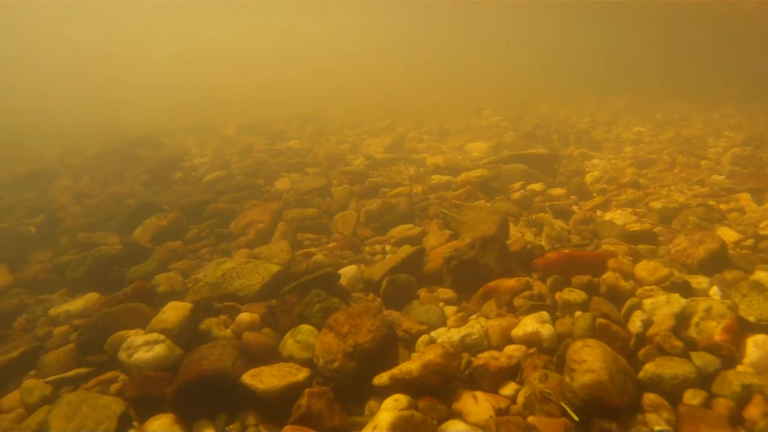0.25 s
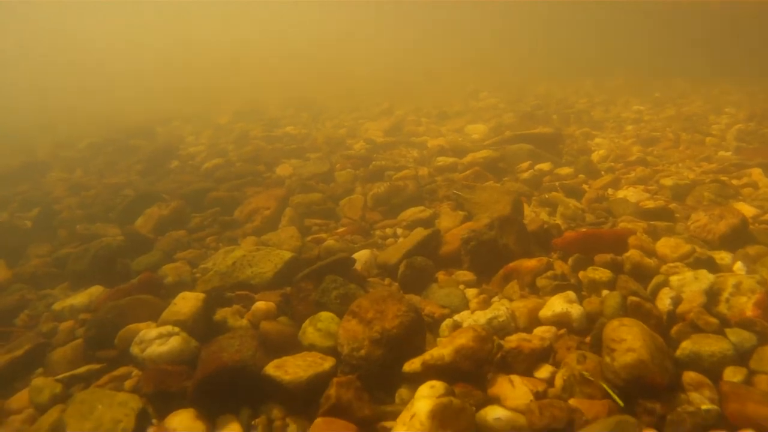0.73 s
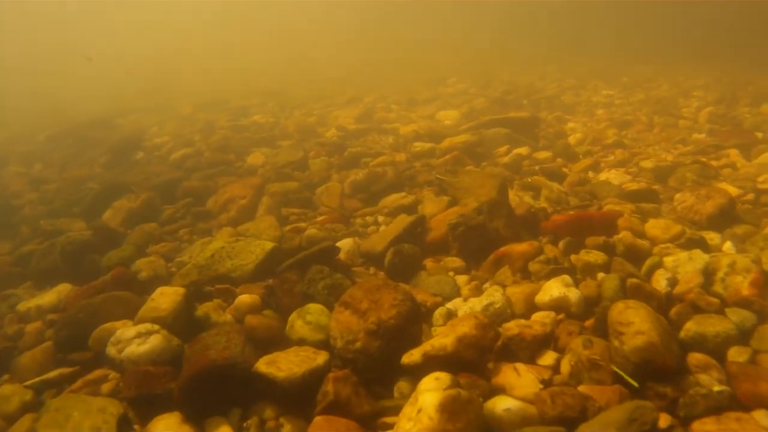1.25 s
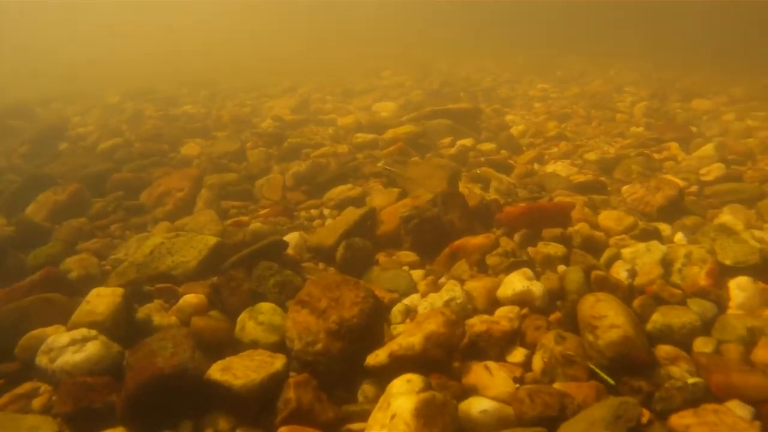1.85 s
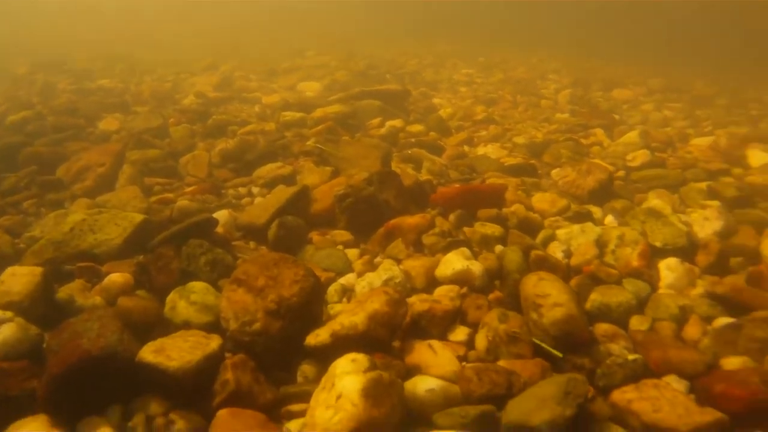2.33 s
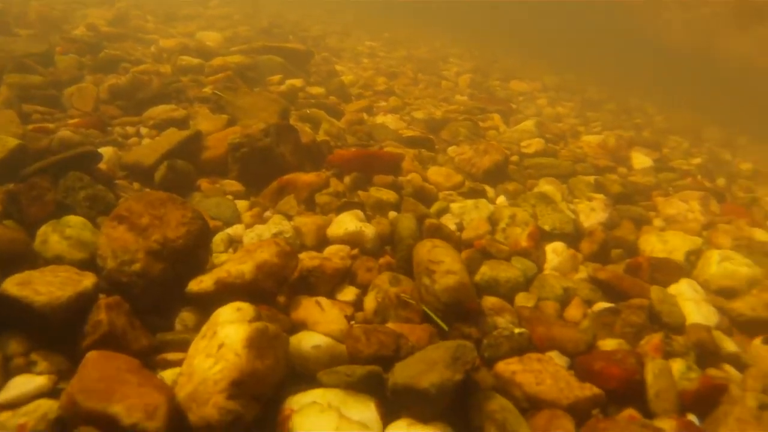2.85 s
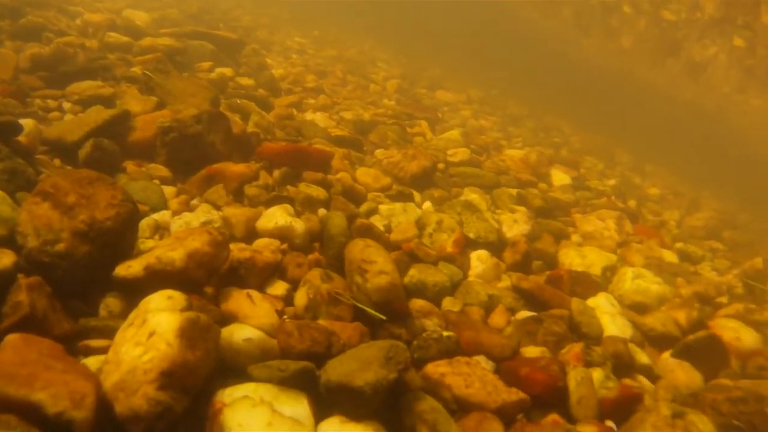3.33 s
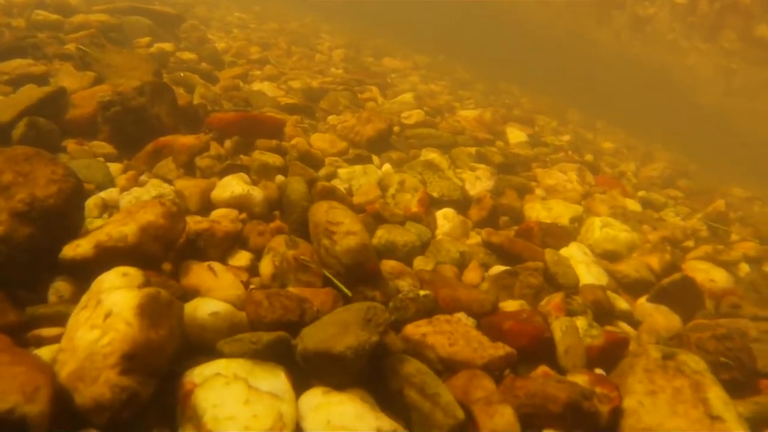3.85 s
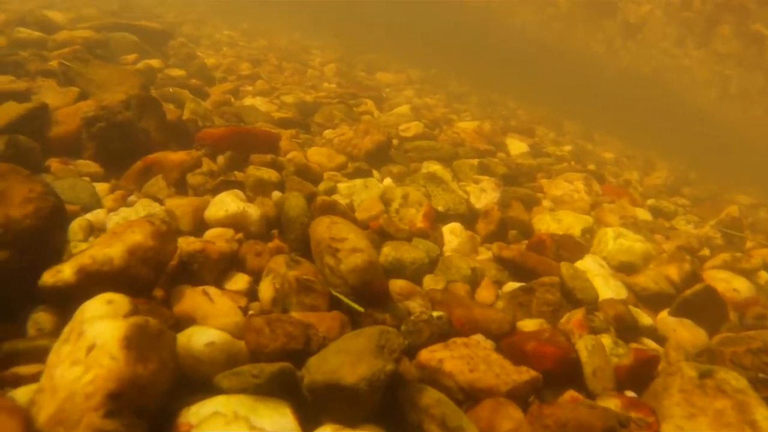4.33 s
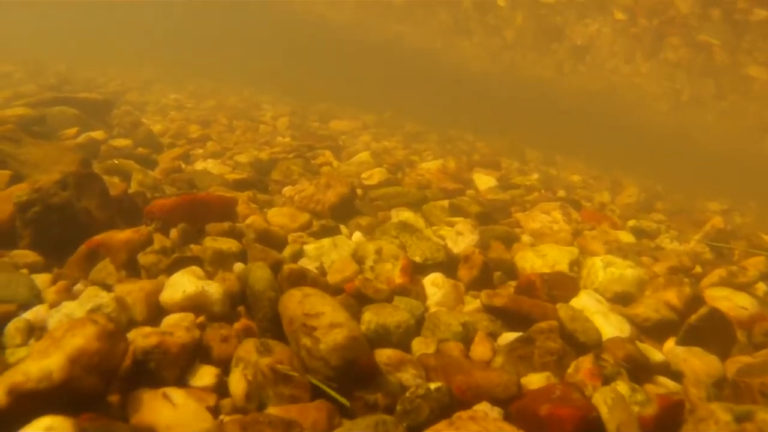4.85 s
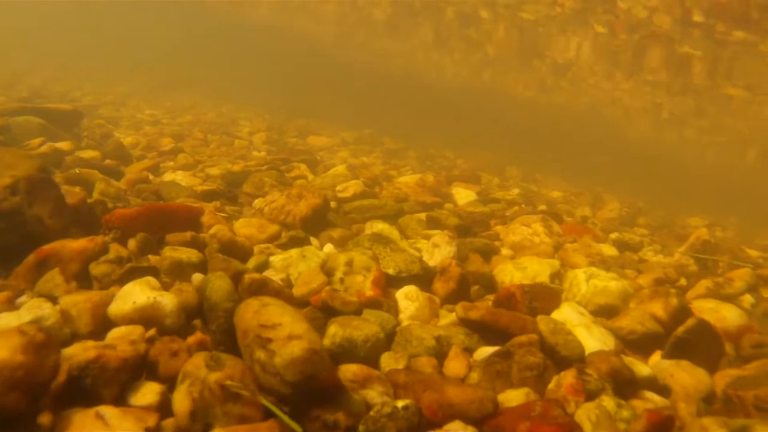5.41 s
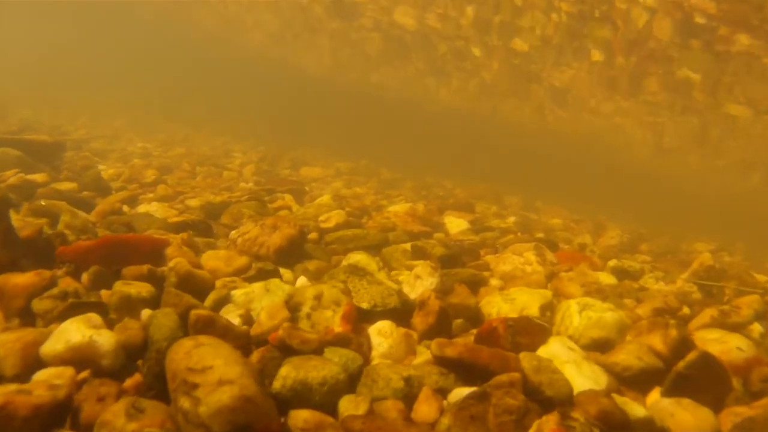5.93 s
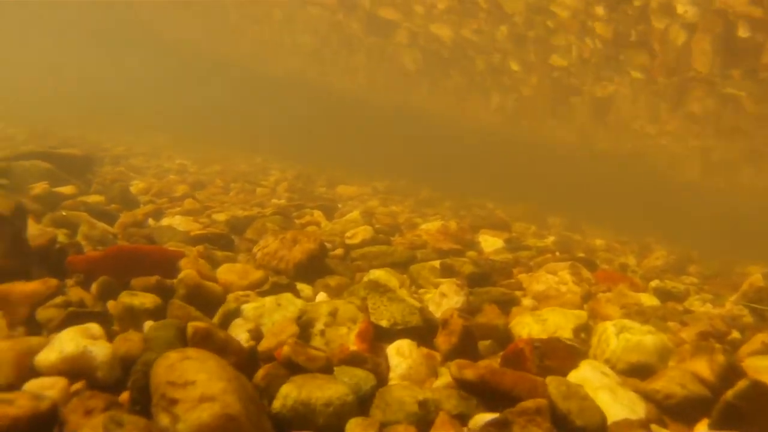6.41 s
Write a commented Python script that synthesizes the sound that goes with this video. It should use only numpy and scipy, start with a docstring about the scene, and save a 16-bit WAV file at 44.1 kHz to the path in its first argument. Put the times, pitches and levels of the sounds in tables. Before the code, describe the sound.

A shallow river is heard underwater through the wall of a plastic housing, close above a stony bed. From the start the current makes a soft, muffled rumble and gurgle over very faint hiss. At about 0.4 seconds a pebble knocks hard and the housing jolts with a dull thump, followed by a brief surge of water. Sparser, lighter knocks, ticks of the mount and tiny snaps of sand follow. Near 3 seconds the flow swells, another hard knock lands, and a few small bubble-like plinks begin. From about 4.3 seconds the impacts crowd together: short hollow knocks, sharp clicks and low thumps, thickest between 4.5 and 5.5 seconds, over a slightly stronger current. A faint sandy swish passes around 6.1 seconds, and more firm knocks continue until a last ringing one at about 6.6 seconds. Everything sounds close and centred.

```python
"""A camera in a plastic housing lies under a shallow river, just over the stony bed. From the start the
current rumbles and gurgles through the wall, over faint amplifier hiss. At 0.4 s a pebble knocks hard and
the housing jolts with a dull thump; sparser knocks, ticks of the mount and snaps of sand follow. Near 3 s
the flow swells and small plinks begin. From 4.3 s to the end the impacts crowd together, each exciting
damped modes. One microphone feeds both channels; only the hiss differs between them."""
import sys
import numpy as np
from scipy import signal
from scipy.fft import rfft, irfft, next_fast_len
from scipy.io import wavfile
from scipy.ndimage import uniform_filter1d, map_coordinates

SR = 44100
rng = np.random.default_rng(int(sys.argv[2]) if len(sys.argv) > 2 else 0)


def unload_audio(sound):
    """Save the sound as a 16-bit wav file, at the path given as the first command line argument."""
    columns = np.transpose(np.atleast_2d(sound))
    # keep every value between -1 and 1, then stretch to whole-number steps
    steps = np.round(np.clip(columns, -1, 1) * 32767)
    wavfile.write(sys.argv[1], SR, steps.astype(np.int16))


N = 294147

# ticks of the mount, before the wall muffles them: (time [s], mount level [dB], bright level [dB])
TICK_EVENTS = [(.388, -43.5, -55.5), (1.3068, -44.5, -69), (1.9268, -39.5, -66), (2.2, -59, -69),
               (2.3054, -39.5, -62), (2.4114, -56, -82), (2.535, -64, -73), (2.5547, -37, -67.5),
               (2.7477, -46, -59), (2.8265, -34.5, -64), (2.844, -58, -65), (2.879, -52, -70),
               (2.9213, -47.5, -75), (2.979, -49, -80), (3.079, -32, -63), (3.4026, -58, -66),
               (3.429, -46.5, -85), (3.5058, -33, -63), (3.8516, -38.5, -66), (3.873, -57, -72),
               (3.9037, -50, -67), (4.102, -54, -58.5), (4.3287, -35, -62.5), (4.4326, -50.5, -69),
               (4.5152, -53, -83), (4.6006, -42, -52.5), (4.625, -55, -63), (4.6661, -55, -68),
               (4.8924, -43.5, -52.5), (4.9211, -55, -50), (5.1616, -47.5, -68), (5.201, -49, -67),
               (5.275, -36.5, -37.5), (5.2945, -45, -48.5), (5.3221, -48, -72), (5.361, -47, -53.5),
               (5.446, -50.5, -67), (5.456, -44.5, -61), (5.465, -38.5, -36), (5.4776, -33.5, -47),
               (5.5478, -48.5, -58), (5.6945, -47.5, -62), (5.765, -50.5, -59.5), (5.8422, -49.5, -73),
               (6.0543, -49, -52), (6.1195, -50, -68), (6.142, -47.5, -52), (6.2273, -41, -51.5),
               (6.5679, -57, -70), (6.633, -49, -60.5)]
SHELL_HZ, SHELL_T60_S, MOUNT_HZ, MOUNT_T60_S = 336.3, 0.021, 1891, 0.024  # modes of the housing


def amp(db):
    """Amplitude grows tenfold for every 20 dB."""
    return 10 ** (np.asarray(db) / 20)


def unit(x):
    """Normalisation to rms 1."""
    return x / np.sqrt(np.mean(x ** 2) + 1e-20)


def wash(depth_db, rate):
    """Amplitude modulation: white noise whose level wanders through rate random values a second."""
    noise, knots = rng.standard_normal(N), rng.standard_normal(int(N * rate / SR) + 4)
    return noise * amp(depth_db * map_coordinates(knots, [np.arange(N) * rate / SR]))


def grit(rate, spread_db):
    """Shot noise at rms 1: about rate impulses a second, a few larger than the rest."""
    chance, polarity, size = rng.random((3, N))
    return unit((chance < rate / SR) * np.sign(polarity - .5) * amp(spread_db * size ** 2))


def coloured(x, points):
    """Spectral shaping by (frequency [Hz], gain [dB]) points on a log axis; the result has rms 1."""
    m = next_fast_len(N + 8192)
    point_hz, db = np.transpose(points)
    gain = amp(np.interp(np.log(np.fft.rfftfreq(m, 1 / SR) + 1), np.log(point_hz), db))
    return unit(irfft(rfft(x, m) * gain, m)[..., :N])


def muffled(x, hz):
    """Transmission loss: the thick wall passes little above hz."""
    return signal.sosfilt(signal.butter(4, hz, fs=SR, output="sos"), x)


def rings(s, db, hz, t60, rise, rough):
    """Damped modes struck at times s: each builds over rise cycles; rough sets its random phase drift."""
    t = np.arange(SR // 12) / SR
    s, db, hz, t60, rough = (np.broadcast_to(v, np.shape(s))[:, None] for v in (s, db, hz, t60, rough))
    envelope = amp(-60 * t / np.clip(t60, .002, .1)) * (1 - np.exp(-t * hz / rise))
    envelope /= envelope.max(axis=1, keepdims=True)
    steps = uniform_filter1d(rng.standard_normal((len(s), len(t))), size=9, axis=1)
    drift = rough * np.sqrt(hz / SR) * np.cumsum(steps, axis=1)
    modes = amp(db) * envelope * np.sin(2 * np.pi * hz * t + drift)
    at = np.round(s * SR).astype(int) + np.arange(len(t))
    return np.bincount(at.ravel(), modes.ravel(), N + SR)[:N]


def scattered(count, db, spread_db, low_hz, high_hz):
    """Random events, uniform in time, level and log frequency: (time [s], level [dB], frequency [Hz])."""
    when, size, pitch = rng.random((count, 3)).T
    return .1 + when * (N / SR - .2), db + spread_db * (2 * size - 1), low_hz * (high_hz / low_hz) ** pitch


def amplifier_hiss(sand):
    """Uncorrelated noise in each channel, over a weaker common part that flickers and carries some sand."""
    # hiss spectrum: (frequency [Hz], relative level [dB])
    spectrum = [(200, 7.5), (1000, 2), (3000, -3.5), (9400, -8.5), (12500, -10), (12800, -26.5),
                (14000, -37)]
    start_db, creep_db_per_s = -81.7, 1.0
    common = coloured(wash(1.3, 39) + 0.4 * sand, spectrum)
    separate = coloured(rng.standard_normal((2, N)), spectrum)
    return (0.368 * common + 0.93 * separate) * amp(start_db + creep_db_per_s * np.arange(N) / SR)


def current(sand):
    """Turbulent pressure: eddies press on the wall while far pebbles and sand patter in the flow."""
    # strength of the current: (time [s], rumble level [dB], gurgle level [dB], babble level [dB])
    flow = [(0.0, -71, -66, -70), (0.43, -63.5, -58.5, -63.5), (0.61, -63, -59, -67.5),
            (1.13, -64, -63, -70.5), (1.39, -63, -61.5, -67), (1.88, -64.5, -67.5, -69.5),
            (2.75, -61, -64, -67), (2.99, -57, -60, -60.5), (4.1, -62.5, -65.5, -68),
            (4.44, -57.5, -68, -66), (4.79, -58, -60.5, -63.5), (5.05, -55.5, -62, -66),
            (5.37, -54.5, -58.5, -64), (5.74, -59.5, -59.5, -61.5), (6.26, -55.5, -57.5, -62.5),
            (6.67, -57, -59, -65)]
    # spectra of the four bands of flow noise: (frequency [Hz], relative level [dB])
    rumble_spectrum = [(12, -33.5), (25, -3.5), (54, 8), (104, 6.5), (160, 6), (400, -120)]
    gurgle_spectrum = [(40, -120), (200, 4.5), (334, -5), (472, 0), (600, -13), (2000, -120)]
    babble_spectrum = [(200, -120), (580, -5), (780, 0.5), (1100, -6.5), (1820, -15.5), (2300, -20),
                       (2930, -40.5), (9000, -120)]
    fizz_spectrum = [(700, -120), (2500, -0.5), (4000, -4.5), (6000, -14.5), (14000, -43)]
    t = np.arange(N) / SR
    flow_s, *levels = np.transpose(flow)
    rumble_db, gurgle_db, babble_db = (np.interp(t, flow_s, db) for db in levels)
    swish_db = 4 * np.exp(-((t - 6.12) / 0.11) ** 2)  # a drift of sand sweeps past
    fizz_db = -89.5 + 0.89 * (rumble_db + 57.5) + swish_db  # the fizz follows the rumble
    patter = grit(rate=200, spread_db=18)
    rumble = coloured(wash(1.8, 18), rumble_spectrum) * amp(rumble_db)
    gurgle = coloured(wash(3.1, 30) + 0.91 * patter, gurgle_spectrum) * amp(gurgle_db)
    babble = coloured(wash(2.03, 40) + 0.66 * patter + .5 * sand, babble_spectrum) * amp(babble_db)
    fizz = coloured(wash(1.1, 30) + 0.44 * patter + 2 * sand, fizz_spectrum) * amp(fizz_db)
    return rumble + gurgle + babble + fizz


def surges():
    """Resonance driven by noise: surges of water swell and ebb in one hollow band each."""
    # surges: (peak time [s], half length [s], frequency [Hz], filter bandwidth [Hz], rms level at peak [dB])
    swells = [(0.69, 0.23, 460, 198, -59.5), (1.25, 0.069, 900, 300, -66.5), (3.0, 0.19, 800, 300, -61),
              (6.103, 0.21, 1700, 1470, -68), (6.15, 0.22, 480, 300, -58)]
    out, t = np.zeros(N), np.arange(N) / SR
    for s, half_s, hz, width_hz, db in swells:
        resonator = signal.iirpeak(hz, hz / width_hz, SR)
        band = signal.lfilter(*resonator, wash(3.5, 35))
        band = signal.lfilter(*resonator, band)
        out += unit(band) * amp(db) * np.exp(-((t - s) / half_s) ** 2)
    return out


def plinks():
    """Free decay of a single mode: nearly pure, brief tones, like trapped bubbles."""
    # plinks: (time [s], frequency [Hz], level [dB], t60 [s])
    tones = [(3.134, 3550, -67.5, .025), (3.423, 2250, -49.5, 0.018), (3.756, 3370, -63.5, 0.017),
             (3.83, 4350, -66, 0.022), (5.322, 1750, -47.5, 0.051), (5.548, 3680, -50, 0.014),
             (5.609, 2430, -55, 0.026), (6.632, 2610, -40, 0.034)]
    s, hz, db, t60 = np.transpose(tones)
    return rings(s, db, hz, t60, rise=0.94, rough=0.055)


def snaps():
    """A short pulse has a broad spectrum: sand grains and the mount's ticks crack without a pitch."""
    # the clearest grains of sand to strike the wall: (time [s], level of the upper band [dB])
    grains = [(0.757, -72), (1.6841, -71), (1.7924, -70), (2.7492, -62), (3.902, -71), (4.0106, -72),
              (4.2594, -70), (5.7636, -60), (6.2442, -63)]
    faint_s, faint_db, faint_hz = scattered(16, db=-72, spread_db=7, low_hz=7000, high_hz=9000)
    sand_s, sand_db = np.transpose(grains)
    tick_s, _, bright_db = np.transpose(TICK_EVENTS)
    s = np.r_[sand_s, tick_s, faint_s]
    high_db = np.r_[sand_db, bright_db - 13, faint_db]
    low_db = np.r_[sand_db + 3, bright_db + 2, faint_db + 3]
    high_hz = np.r_[np.full(len(s) - len(faint_s), 7870), faint_hz]
    high = rings(s, high_db, high_hz, t60=0.002, rise=0.42, rough=1.1)
    low = rings(s, low_db, hz=3060, t60=0.004, rise=0.2, rough=2.07)
    return high + muffled(low, hz=6250)


def thumps():
    """Heavy damping: the water holds each jolt to a swing and a half under a Gaussian envelope."""
    # jolts of the whole housing: (peak time [s], envelope level [dB], frequency [Hz])
    jolts = [(.405, -31, 93), (.702, -37, 101), (.816, -40.5, 103), (1.309, -44.5, 75), (1.627, -49.5, 109),
             (1.928, -43.5, 67.5), (2.066, -46.5, 96), (2.146, -46, 121), (2.306, -41.5, 76),
             (2.555, -40, 70.4), (2.825, -36, 77.6), (3.077, -33, 70), (3.501, -36, 89), (3.541, -44, 109),
             (3.848, -35, 84), (4.217, -44, 103), (4.317, -33, 80), (4.337, -38.5, 79), (4.573, -36, 76),
             (4.603, -38.5, 87), (4.892, -34.5, 80), (4.926, -34.5, 82), (5.165, -48, 116),
             (5.213, -45, 95), (5.276, -35, 80), (5.299, -27, 94), (5.327, -43, 105), (5.465, -33.5, 82),
             (5.484, -27.5, 95), (5.685, -45.5, 92), (5.738, -42.5, 85), (5.753, -33, 93), (5.768, -29, 85),
             (6.02, -41.5, 102), (6.159, -38, 77), (6.203, -44, 85), (6.252, -27, 90.5), (6.356, -39, 100),
             (6.495, -40, 94), (6.548, -43, 111)]
    faint = scattered(22, db=-49.5, spread_db=3, low_hz=73.5, high_hz=121.5)
    out, t = np.zeros(N + SR), np.arange(-SR // 25, SR // 25) / SR
    for s, db, hz in np.vstack([jolts, np.transpose(faint)]):
        swing = np.exp(-(t * hz / 0.59) ** 2) * np.cos(2 * np.pi * hz * t + 0.86)
        out[round(s * SR) - SR // 25:][:len(t)] += amp(db) * swing
    return out[:N]


def mount_ticks(pebble_s, pebble_db):
    """Contact damping: the mount ticks in two modes, the lower cut short if weak or pressed by a pebble."""
    s, mount_db, bright_db = np.transpose(TICK_EVENTS)
    together = np.abs(s[:, None] - pebble_s) < .002
    pressing_db = np.where(together, pebble_db, -120).max(axis=1)
    weakness_db = np.clip(-45 - mount_db, 0, None)  # shortfall from a firm tick
    damping = np.clip(np.maximum((pressing_db - mount_db + 4.5) / 14, weakness_db / 8), 0, 1)
    mount = rings(s, mount_db, MOUNT_HZ, MOUNT_T60_S * (1 - .5 * damping), rise=1, rough=.28 + .5 * damping)
    bright = rings(s, bright_db, hz=3970, t60=0.0087, rise=0.35, rough=0.65)
    alone = ~together.any(axis=1)  # a tick with no pebble has its own thud and rings a panel
    thud_db = (mount_db + 1.5 - 3 * weakness_db)[alone]
    shell = rings(s[alone], thud_db, SHELL_HZ, SHELL_T60_S, rise=0.18, rough=1)
    panel = rings(s[alone], thud_db - 18, hz=527, t60=0.069, rise=0.65, rough=1.8)
    return muffled(shell, 960) + muffled(panel, 1700) + muffled(mount, 2580) + muffled(bright, 4950)


def pebble_knocks():
    """Impact excitation rings pebble, shell and mount; returns the sound, strike times and ring levels."""
    # pebble strikes, before the wall: (time [s], frequency [Hz], ring level [dB], t60 [s], thud level [dB])
    strikes = [(.1647, 1380, -49, 0.011, -45), (.2387, 604, -52, .045, -41),
               (.388, 830, -38.5, .031, -36.5), (.3993, 537, -19, .026, -25.5), (.697, 600, -57, .015, -44),
               (.811, 600, -51, 0.017, -40), (.8685, 1310, -52.5, 0.013, -50),
               (.8868, 1540, -48.5, .011, -48), (.991, 1410, -57, .011, -60),
               (1.3992, 710, -30.5, 0.0097, -35), (1.51, 1310, -50.5, .013, -49),
               (1.6106, 960, -51, 0.018, -46), (1.6289, 673, -44.5, 0.031, -54),
               (2.1055, 850, -45, 0.01, -41.5), (2.4308, 680, -44.5, 0.0072, -52),
               (2.7479, 930, -37.5, .011, -49), (3.0422, 1330, -41, 0.02, -71.5),
               (3.0818, 724, -20.5, 0.023, -33), (3.429, 1520, -44, 0.023, -65),
               (3.5405, 1010, -52.5, 0.061, -38.5), (3.5745, 485, -44.5, .02, -39.5),
               (3.8519, 508, -42, 0.048, -31.5), (4.0422, 957, -46.5, 0.029, -55),
               (4.2729, 1010, -47.5, 0.031, -44), (4.3289, 543, -41, 0.037, -25.5),
               (4.4869, 748, -30, 0.018, -57), (4.506, 1305, -43.5, 0.021, -63),
               (4.5152, 930, -47, 0.028, -46.5), (4.6009, 1255, -28, 0.041, -22.5),
               (4.6668, 1300, -46.5, .025, -44), (4.7106, 1190, -43.5, 0.014, -42),
               (4.8048, 1400, -38.5, 0.014, -43), (4.8924, 760, -35, 0.032, -38),
               (4.9026, 600, -24.5, 0.023, -25.5), (4.9207, 1240, -31, 0.031, -25),
               (5.1612, 560, -37.5, 0.035, -27.5), (5.275, 825, -31, 0.031, -35),
               (5.2925, 1350, -26.5, 0.025, -23), (5.314, 796, -35, 0.024, -42),
               (5.4565, 1430, -42, 0.034, -56), (5.465, 855, -28.5, 0.019, -35),
               (5.4776, 1465, -31, 0.032, -23.5), (5.4995, 590, -35.5, 0.0071, -44),
               (5.6775, 840, -36, .015, -38), (5.6865, 1350, -38, 0.011, -49),
               (5.765, 544, -52, 0.017, -34), (6.1203, 970, -45, 0.02, -40), (6.141, 840, -41, 0.022, -59),
               (6.2278, 725, -36.5, 0.019, -55), (6.245, 900, -25.5, 0.031, -26.5),
               (6.354, 870, -34, 0.037, -37), (6.3713, 1300, -43, .014, -58),
               (6.4886, 500, -30.5, 0.042, -24), (6.558, 1300, -45.5, .012, -58),
               (6.612, 1325, -57, .013, -39), (6.633, 1032, -23.5, 0.053, -60)]
    faint_s, faint_db, faint_hz = scattered(24, db=-52, spread_db=3, low_hz=599, high_hz=1601)
    faint = np.transpose([faint_s, faint_hz, faint_db, np.full_like(faint_s, .013), faint_db - 0.5])
    s, hz, db, t60, thud_db = np.vstack([strikes, faint]).T
    deadness = np.clip(1.3 - t60 / 0.044, 0, 1)  # a dead pebble crunches, a free one rings
    force = np.clip(1.5 + 0.2 * (db + 36), .2, 1)  # soft strikes crunch less
    shell = rings(s, thud_db, SHELL_HZ, SHELL_T60_S, rise=0.18, rough=1)
    pebble = rings(s, db, hz, t60, rise=0.44, rough=1.9 * deadness * force)
    mount = rings(s, db - 23.5, MOUNT_HZ, MOUNT_T60_S / 2, rise=1, rough=1)
    return muffled(shell, 960) + muffled(pebble, 1700) + muffled(mount, 2580), s, db


def scene():
    """Superposition: the river and the impacts add at one microphone, and the amplifiers add hiss."""
    sand = grit(rate=46, spread_db=9)
    background = amplifier_hiss(sand) + current(sand) + surges()
    knocks, pebble_s, pebble_db = pebble_knocks()
    return background + plinks() + snaps() + thumps() + mount_ticks(pebble_s, pebble_db) + knocks


def record(dry):
    """Band limiting: an ideal low-pass removes the highest treble."""
    top_hz, m = 14110, next_fast_len(N + 8192)
    return irfft(rfft(dry, m) * (np.fft.rfftfreq(m, 1 / SR) < top_hz), m)[:, :N]


dry = scene()
out = record(dry)
unload_audio(out)
```